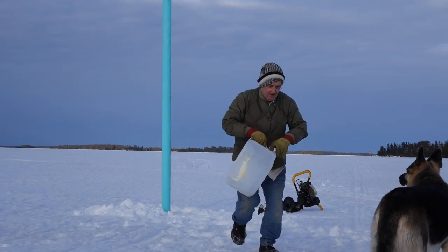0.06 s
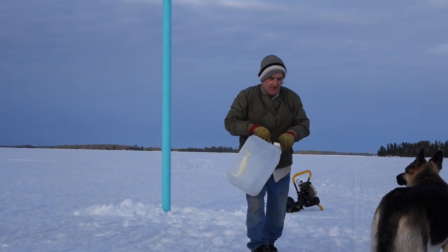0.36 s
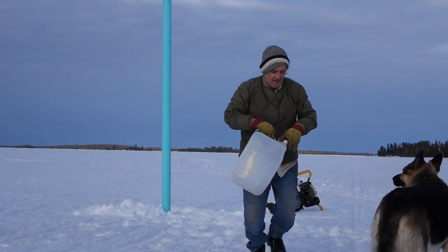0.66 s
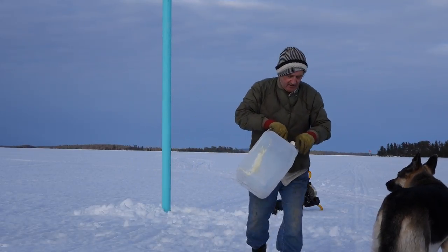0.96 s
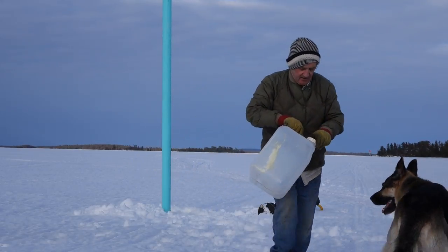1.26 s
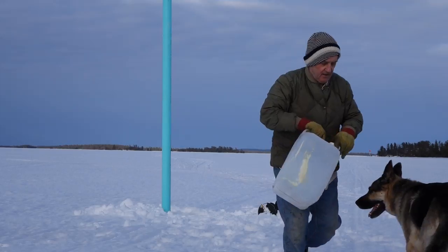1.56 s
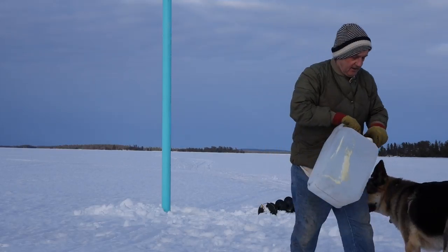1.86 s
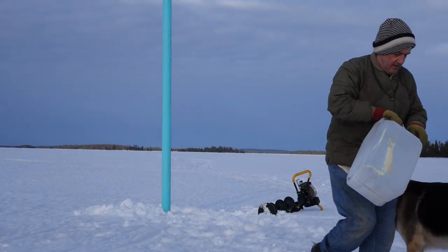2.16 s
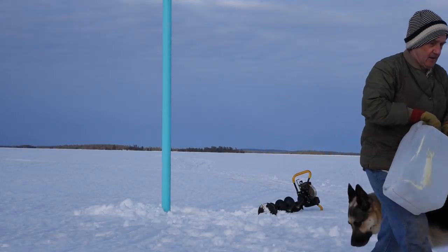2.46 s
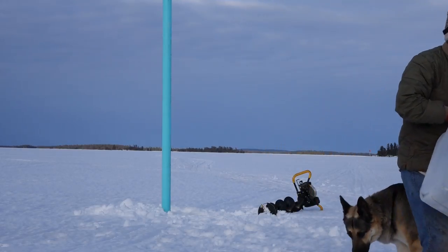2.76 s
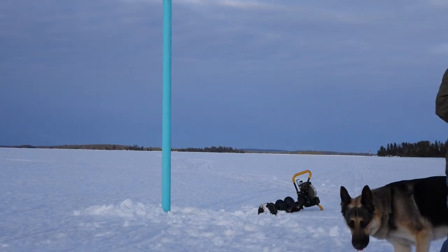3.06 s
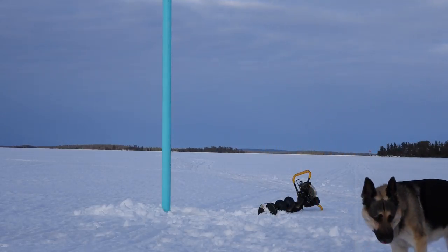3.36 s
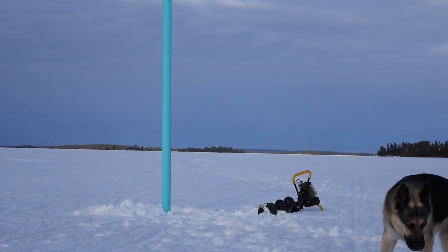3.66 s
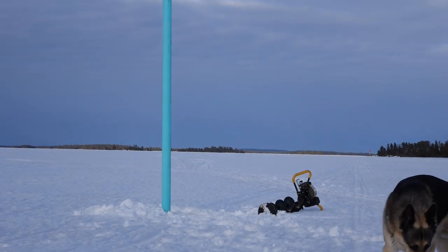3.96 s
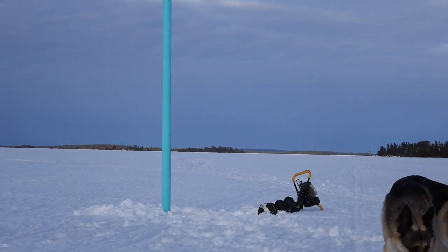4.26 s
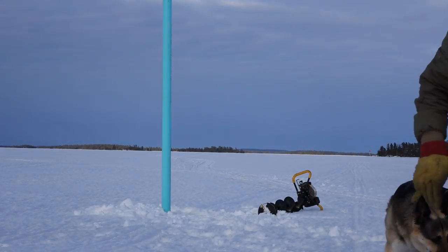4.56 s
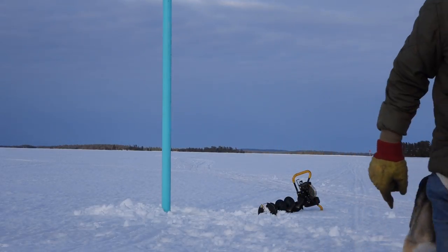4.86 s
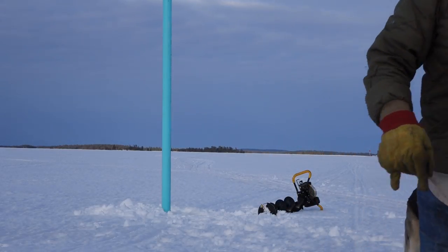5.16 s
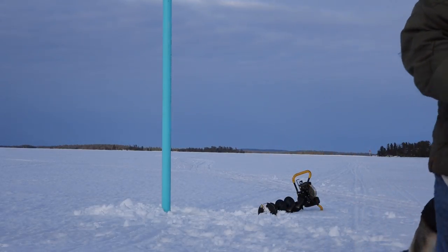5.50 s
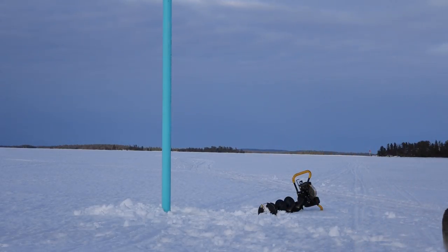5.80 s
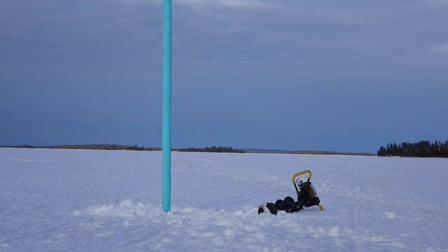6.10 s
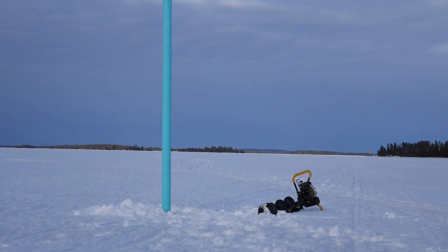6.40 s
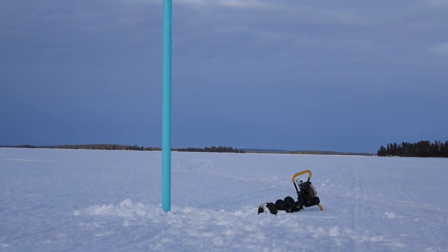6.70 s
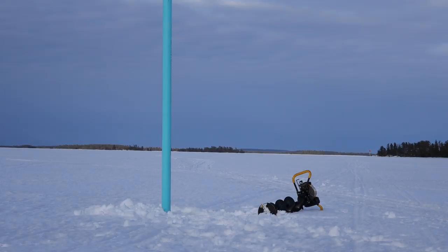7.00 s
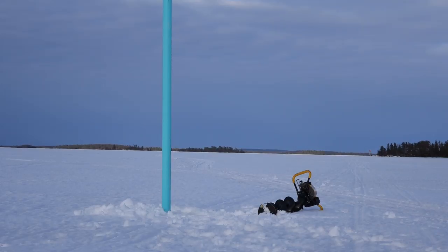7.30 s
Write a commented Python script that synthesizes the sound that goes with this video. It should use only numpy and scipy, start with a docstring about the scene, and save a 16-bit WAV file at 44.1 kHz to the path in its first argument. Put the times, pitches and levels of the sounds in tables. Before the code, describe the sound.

Footsteps crunch on packed snow, approaching from a distance, then creak loudly right beside the microphone before a jacket swishes in still air.

```python
"""On a frozen lake, a man in boots walks up over packed snow, treads beside a camera and passes behind it.
Each load compacts the snow (low creak), fractures its crust (crunch) and sifts powder (fizz); stick-slip
friction adds brief squeaks. His jacket swishes as cloth rubs on cloth, and an empty jug thuds against him.
The air is still, so the faint purr of the camera's mechanism is heard over a steady hush."""
import sys
import numpy as np
from scipy import signal
from scipy.fft import rfft, irfft, next_fast_len
from scipy.io import wavfile
from scipy.ndimage import uniform_filter1d, map_coordinates

SR = 44100
rng = np.random.default_rng(int(sys.argv[2]) if len(sys.argv) > 2 else 0)


def transcribe(u):
    """Save the signal u as a 16-bit wav file named by the first command-line argument.

    u: samples, shape (n,) or (channels, n), limited to [-1, 1]; the rate is SR.
    q: integer samples, one column per channel.
    """
    v = np.clip(np.atleast_2d(u).T, -1, 1)
    q = np.round(v * 32767).astype(np.int16)
    wavfile.write(sys.argv[1], SR, q)


N = 323694
TIME = np.arange(N) / SR


# shifts of weight close by, at relative levels: start_s, hold_s, creak_db, crunch_db, powder_db
TREADS = [(4.583, 0.048, -26, -32.5, -46.5), (4.65, 0.16, -41.5, -45, -54.5),
          (4.732, 0.14, -63, -42, -44.5), (4.802, 0.11, -40, -31.5, -52), (4.853, 0.085, -19.5, -34, -46),
          (4.958, 0.023, -32, -71, -52.5), (5.074, 0.045, -24.5, -37.5, -53),
          (5.136, 0.056, -22.5, -29, -43), (5.218, 0.13, -36.5, -32.5, -41.5),
          (5.364, 0.047, -32.5, -32.5, -45), (5.43, 0.07, -40, -39.5, -44.5), (5.55, 0.039, -48, -41, -59),
          (5.653, 0.27, -49, -52.5, -63.5)]
# spectra of snow yielding close by: frequency_hz, level_db
NEAR_CREAK = [(20, -46), (55, -47), (110, -14), (170, -4), (215, -9), (280, -16), (335, -2), (385, 2),
              (480, -3.5), (610, -0.5), (760, -8.5), (950, -29), (1300, -40), (2100, -97)]
NEAR_RASP = [(300, -23), (520, -8.5), (680, 4.5), (980, -6.5), (1300, -6), (2200, -55)]
NEAR_CRUNCH = [(500, -28), (900, 3), (1300, -0.5), (1600, 0.5), (2300, 2), (3100, -6), (4200, -7),
               (7000, -119)]
NEAR_POWDER = [(2000, -19), (3000, -11.5), (4500, -7), (6000, -6.5), (7500, -12), (11500, -12)]

def close_treads(attack_s=0.01, sag_db_per_s=26.5, releases_db_per_s=(227, 405, 324)):
    """Compaction: under full weight the snow packs in quick slips, heard as a hollow creak."""
    gains = np.zeros((3, N))
    for start, hold, *levels_db in TREADS:
        for gain, db, release in zip(gains, levels_db, releases_db_per_s):
            gain += amp(db) * envelope(start, hold, attack_s, sag_db_per_s, release)
    creak, crunch, powder = gains
    rasp = np.sqrt(creak * crunch)  # the creak's upper edge lasts only while crust still breaks
    return (creak * amp(-3.5) * grains(NEAR_CREAK, per_s=420, spread_db=0.5, clump_db=2, clump_hz=120,
                                       smear=0.36, patchy_db=2)
            + rasp * amp(-4.5) * grains(NEAR_RASP, per_s=250, spread_db=1.5, clump_db=2, clump_hz=190,
                                        smear=0.43, patchy_db=5)
            + crunch * amp(-6) * grains(NEAR_CRUNCH, per_s=1400, spread_db=0.5, clump_db=2.4,
                                        clump_hz=73, smear=0.96, patchy_db=6.5)
            + powder * amp(2) * grains(NEAR_POWDER, per_s=6000, spread_db=1.5, clump_db=3, clump_hz=79,
                                       smear=1.6, patchy_db=4))


# footfalls, at relative levels: start_s, full_weight_after_s, lift_after_s, creak_db, crunch_db, powder_db
STEPS = [(0.315, 0.066, 0.23, -63, -59, -59.5), (0.829, 0.13, 0.24, -56, -55, -56.5),
         (1.32, 0.15, 0.16, -53, -53.5, -53.5), (1.805, 0.055, .055, -54.5, -60.5, -73.5),
         (1.901, 0.052, 0.208, -54, -53, -58), (2.435, 0.013, 0.035, -53, -53.5, -58.5),
         (2.545, 0.072, 0.11, -72, -65, -72), (2.92, 0.15, .17, -57.5, -54.5, -54),
         (3.545, 0.15, 0.23, -54, -51.5, -49.5), (4.163, 0.098, 0.28, -52, -50, -50.5),
         (5.782, 0.12, 0.17, -44.5, -45, -52.5)]
# spectra of snow yielding farther off: frequency_hz, level_db
FAR_CREAK = [(50, -41), (110, -33), (185, -7.5), (280, -18), (380, -1.5), (620, 4.5), (850, -5),
             (1400, -47)]
FAR_CRUNCH = [(460, -57.5), (780, -8.5), (1300, 0), (1440, -3.5), (1710, -3), (3200, -9), (4160, -30),
              (7040, -120)]
FAR_POWDER = [(2000, -25.5), (2900, -11), (3700, -6), (4800, 2), (6500, 3), (8000, 0), (10000, 2),
              (11500, -1.5)]

def walking_steps(touch_s=0.0045, sink_s=0.044, lift_decays_s=(0.022, 0.014, 0.038), settle_db=-10):
    """Acoustic emission: creak and crunch grow with the load and ease as the snow firms."""
    gains = np.zeros((3, N + SR))
    t = np.arange(SR) / SR
    for start, full, lift, *levels_db in STEPS:
        unloading = np.exp(-np.maximum(t - lift, 0) / np.vstack(lift_decays_s))
        unloading = np.maximum(unloading, amp(settle_db))  # loose snow goes on settling in the print
        contact = (1 - np.exp(-t / touch_s)) * unloading
        weight = crest(t - full, rise_db_per_s=75, fall_db_per_s=58.5)
        sifting = crest(t - sink_s, rise_db_per_s=172, fall_db_per_s=41.5)  # peaks as the heel sinks in
        step = contact * amp(np.vstack(levels_db)) * [weight, weight, sifting]
        gains[:, round(start * SR):][:, :SR] += step
    creak, crunch, powder = gains[:, :N]
    creak = creak * amp(-6) * grains(FAR_CREAK, per_s=780, spread_db=2, clump_db=4.5, clump_hz=230,
                                     smear=0.58, patchy_db=7)
    crunch = crunch * amp(-1.5) * grains(FAR_CRUNCH, per_s=1300, spread_db=0.5, clump_db=2,
                                         clump_hz=100, smear=0.94, patchy_db=5)
    powder = powder * amp(1.6) * grains(FAR_POWDER, per_s=4100, spread_db=1.5, clump_db=2.8,
                                        clump_hz=74, smear=3.2, patchy_db=1.5)
    return creak + panned(crunch, left_db=0.7) + panned(powder, left_db=0.5)


# short crunches and ticks of snow, and three soft knocks near the end, probably the jug,
# at relative levels: start_s, low_db, middle_db, high_db
BURSTS = [(0.033, -68, -59.5, -59.5), (0.2, -75, -65, -71), (0.226, -72, -64.5, -68),
          (0.316, -80, -60.5, -60.5), (0.349, -70, -58.5, -55), (0.375, -72, -57.5, -54),
          (0.541, -78, -60, -58.5), (0.589, -78, -61.5, -59.5), (0.94, -61, -55, -54),
          (1.068, -60.5, -54.5, -57.5), (1.424, -48.5, -46, -51), (1.554, -66, -61, -74),
          (1.717, -70, -61.5, -77), (1.869, -69, -60, -57), (2.021, -45.5, -41.5, -47),
          (2.132, -62.5, -52, -47.5), (2.532, -55, -58, -58), (2.637, -53, -57, -62),
          (2.953, -56, -57, -51), (3.958, -70, -59.5, -44.5), (4.011, -65, -70, -46.5),
          (4.051, -55.5, -55, -41.5), (4.079, -60, -58.5, -53), (4.113, -59.5, -70, -56),
          (4.167, -56, -59, -55), (5.091, -41, -27, -33), (5.148, -36, -25, -38), (5.374, -42, -30.5, -54),
          (5.438, -39, -34, -63), (5.519, -55, -40.5, -35.5), (5.674, -42.5, -38, -48),
          (6.004, -45, -51.5, -55.5), (6.358, -44.5, -45, -58), (7.012, -47, -44, -51)]

def crunches_and_knocks(rise_s=0.0018, burst_s=0.018, tail_db=-22, tail_s=0.063):
    """Transient excitation: each crunch, tick or soft knock is one dense burst of grains."""
    gains = np.zeros((3, N + SR))
    t = np.arange(SR // 4) / SR
    stretch = np.vstack([1.5, 1, 1])  # the low band rises and falls more slowly
    onset = (1 - np.exp(-t / (rise_s * stretch))) ** 2
    decay = np.exp(-(t / (burst_s * stretch)) ** 2) + amp(tail_db) * np.exp(-t / tail_s)
    for start, *levels_db in BURSTS:
        gains[:, round(start * SR):][:, :len(t)] += amp(np.vstack(levels_db)) * onset * decay
    low, middle, high = gains[:, :N]
    return (low * amp(-1.5) * grains(FAR_CREAK, per_s=660, spread_db=4, clump_db=1, clump_hz=410,
                                     smear=0.32, patchy_db=4)
            + middle * amp(-2) * grains(NEAR_CRUNCH, per_s=3800, spread_db=0.5, clump_db=1.5,
                                        clump_hz=150, smear=0.52, patchy_db=4.5)
            + high * amp(-1) * grains(FAR_POWDER, per_s=2400, spread_db=7, clump_db=1, clump_hz=550,
                                      smear=0.49, patchy_db=1.5))


# cold crystals squeaking or groaning under the sole: centre_s, half_length_s, pitch_hz, level_db
SQUEAKS = [(2.976, 0.027, 920, -53.5), (4.28, .026, 1300, -44.5), (4.83, 0.018, 2406, -39),
           (4.937, 0.024, 511, -21), (5.124, 0.011, 380, -23), (5.192, 0.0062, 5640, -35.5),
           (5.405, 0.0072, 388, -21), (5.497, 0.014, 5590, -40), (5.526, 0.0056, 2648, -33),
           (5.918, 0.019, 1150, -46.5)]

def squeaks(waver_rad=1.43, knots_per_cycle=0.24, flutter=0.5, low_cut_hz=280):
    """Stick-slip friction briefly locks to one rough pitch; phase and size stray every few slips."""
    out = np.zeros(N)
    for centre, half_length, hz, db in SQUEAKS:
        stray_hz = knots_per_cycle * hz
        slips = np.sin(2 * np.pi * hz * TIME + waver_rad * wobble(stray_hz))
        slips *= 1 + flutter * wobble(stray_hz)
        out += amp(db) * np.exp(-((TIME - centre) / half_length) ** 2) * slips
    highpass = signal.butter(4, low_cut_hz, 'high', fs=SR, output='sos')
    return panned(signal.sosfilt(highpass, out), left_db=1.2)


# long sleeve strokes, and bouts of the clothes stirring: start_s, length_s, level_db
SWISHES = [(6.128, .62, -41), (7.053, .3, -43.5)]
RUSTLES = [(0, 0.23, -70.5), (1.553, 0.59, -73.5), (2.285, 0.21, -69.5), (3.78, 1.4, -68),
           (4.59, 1.073, -62.5), (5.904, 2.4, -59)]
# spectra of sliding cloth and of stirring folds: frequency_hz, level_db
CLOTH = [(71, -64), (120, -41), (220, -17), (276, -16.5), (395, -4.5), (780, -4), (1020, -6.5), (1160, -4),
         (1300, -2), (1510, -6.5), (2570, 0), (3040, -1.5), (11000, -5), (14300, -43), (22000, -120)]
FOLDS = [(60, -38), (170, -15), (300, -22.5), (450, -12.5), (1200, -5.5), (2400, -2.5), (3600, -9),
         (11000, -6)]

def jacket():
    """Friction noise: rubbing cloth gives a faint, uneven rustle and two long swishes."""
    swish = sum(amp(db) * envelope(start, length, attack_s=0.097, sag_db_per_s=14.5, release_db_per_s=107)
                for start, length, db in SWISHES)
    rustle = sum(amp(db) * envelope(start, length, attack_s=0.005, sag_db_per_s=-3, release_db_per_s=105)
                 for start, length, db in RUSTLES)
    rustle *= amp(0.67 * wobble(21.5))
    sliding = grains(CLOTH, per_s=9000, spread_db=1, clump_db=1.2, clump_hz=91, smear=1.6, patchy_db=1.5)
    folding = grains(FOLDS, per_s=1100, spread_db=1, clump_db=5, clump_hz=66, smear=1.35, patchy_db=2.5)
    return panned(swish * sliding, left_db=-0.6) + rustle * folding


# bumps of the empty plastic jug: start_s, level_db
BUMPS = [(0.225, -71.5), (1.833, -59), (1.905, -62), (1.955, -64), (3.824, -60), (6.359, -71), (6.533, -72),
         (7.017, -54)]
# spectrum of its hollow body: frequency_hz, level_db
JUG_BODY = [(40, -40), (100, -21), (185, -1), (280, -15), (420, -3), (800, -23), (1500, -66)]

def jug():
    """Impact excitation: a soft contact stirs the low resonances of a hollow body into a short thud."""
    thuds = sum(amp(db) * envelope(start, 0.017, attack_s=0.0082, sag_db_per_s=0, release_db_per_s=330)
                for start, db in BUMPS)
    return thuds * coloured(rng.standard_normal((1, N)), JUG_BODY)


# resonant spectrum of the camera's case: frequency_hz, level_db
CAMERA_CASE = [(250, -52), (400, -16.5), (520, -26.5), (612, 2), (690, -3.5), (800, -48.5), (2000, -58.5)]

def camera_purr(twitch_hz=30, depth_db=5, level_db=-71.5, delay_s=0.014):
    """Forced vibration: the mechanism twitches periodically and rings the camera's case."""
    twitch = amp(depth_db * np.cos(2 * np.pi * twitch_hz * (TIME - delay_s)))
    return amp(level_db) * coloured(twitch * rng.standard_normal((1, N)), CAMERA_CASE)


# spectrum of the hush: frequency_hz, level_db
HUSH = [(20, -68), (80, -39), (170, -9), (280, -16.5), (380, -0.5), (520, 2), (610, 11), (850, -13.5),
        (1800, -6), (3200, -14.5), (11000, -18)]

def still_air(level_db=-73):
    """Stationary noise: the lake and the microphone set a steady floor."""
    return amp(level_db) * coloured(two_ports(rng.standard_normal(N)), HUSH)


def grains(spectrum, per_s, spread_db, clump_db, clump_hz, smear, patchy_db, window=768):
    """Shot noise: tiny slips click in small avalanches over a smear of finer ones, at steady power."""
    clicks = (rng.random(N) < per_s / SR) * rng.choice([-1, 1], N)
    clicks = clicks * amp(spread_db * rng.standard_normal(N))
    slips = clicks / np.std(clicks) + smear * rng.standard_normal(N)
    avalanches = slips * amp(clump_db * wobble(clump_hz))
    pair = coloured(two_ports(patchy(avalanches, patchy_db)), spectrum)
    power = uniform_filter1d(uniform_filter1d(pair.mean(axis=0) ** 2, window), window)
    return pair / np.sqrt(np.abs(power) + 1e-6)


def patchy(x, depth_db, window=384, frames=9):
    """Local resonance: each patch of snow or cloth rings its own way, so narrow peaks come and go."""
    spectra = signal.stft(x, nperseg=window)[2]
    peaks = uniform_filter1d(rng.standard_normal(spectra.shape), size=2, axis=0)
    peaks = uniform_filter1d(peaks, size=frames, axis=1)
    return signal.istft(spectra * amp(depth_db * peaks / np.std(peaks)), nperseg=window)[1][:N]


# the walker's bearing, from ahead to the right: time_s, left_port_lag_s
BEARING = [(1, -.00002), (3.7, .000045), (5, .000025)]
# likeness of the sound at the two microphone ports: frequency_hz, direct_share
COHERENCE = [(60, 0.99), (450, 0.97), (900, 0.99), (1400, 0.51), (2200, 0.64), (4200, 0.59), (8000, 0.077)]

def two_ports(x, window=96):
    """Path difference delays one port; scatter off the snow reaches each port in random phase."""
    hz, t, spectra = signal.stft(x, SR, nperseg=window)
    lag_s = np.interp(t, *np.transpose(BEARING))
    share = np.clip(along(COHERENCE, hz), 0, 1)[:, None]
    lag_cycles = lag_s * np.multiply.outer([.5, -.5], hz)[..., None]
    direct = np.sqrt(share) * np.exp(-2j * np.pi * lag_cycles)
    # scattered copies add in power only, hence the root of two
    scatter = np.sqrt(2 * (1 - share)) * np.exp(2j * np.pi * rng.random((2, *spectra.shape)))
    return signal.istft(spectra * (direct + scatter), nperseg=window)[1][:, :N]


# resonances and notches of the microphone housing: centre_hz, width_hz, gain_db
HOUSING = [(1023, 180, 6.5), (1175, 35, -13), (1311, 44, 9), (1410, 530, -3.5), (1760, 99, 4.5),
           (2017, 220, -5.5), (2076, 210, 4), (3520, 35, 7), (3610, 420, -0.5), (4500, 380, 1.5),
           (7140, 930, -0.5)]

def coloured(x, spectrum, taps=4096):
    """Minimum-phase filtering by source spectrum and housing; the channel mean comes out at rms 1."""
    hz = np.fft.rfftfreq(taps, 1 / SR)
    housing_db = sum(db / (1 + (2 * (hz - centre) / width) ** 2) for centre, width, db in HOUSING)
    cepstrum = irfft(np.log(amp(along(spectrum, hz) + housing_db) + 1e-6))
    cepstrum[1:taps // 2] *= 2  # folding the cepstrum makes the response causal
    cepstrum[taps // 2 + 1:] = 0
    impulse_response = irfft(np.exp(rfft(cepstrum)))
    y = signal.oaconvolve(x, impulse_response[None], axes=1)[:, :N]
    return y / np.std(y.mean(axis=0))


def envelope(start_s, hold_s, attack_s, sag_db_per_s, release_db_per_s):
    """Exponential decay of one contact: a smooth attack, a sloping hold and a release."""
    t = np.maximum(TIME - start_s, 0)
    fall_db = sag_db_per_s * np.minimum(t, hold_s) + release_db_per_s * np.maximum(t - hold_s, 0)
    return (1 - np.exp(-(t / attack_s) ** 2)) * amp(-fall_db)


def crest(t, rise_db_per_s, fall_db_per_s):
    """Exponential growth to a gain of 1 at t = 0, then exponential decay."""
    return amp(np.minimum(rise_db_per_s * t, -fall_db_per_s * t))


def wobble(knots_per_s):
    """Random modulation: a smooth curve through Gaussian knots."""
    knots = rng.standard_normal(int(N * knots_per_s / SR) + 4)
    coarse_s = TIME[::16]
    return np.interp(TIME, coarse_s, map_coordinates(knots, [coarse_s * knots_per_s]))


def panned(x, left_db):
    """A level difference leans the sound to the left."""
    return x * amp(np.array([[.5], [-.5]]) * left_db)


def filtered(x, response):
    """Linear filtering: the spectrum of x times a response of frequency."""
    size = next_fast_len(N + SR // 2)
    return irfft(rfft(x, size) * response(np.fft.rfftfreq(size, 1 / SR)), size)[..., :N]


def along(points, hz):
    """Interpolation of (frequency_hz, value) points on a logarithmic frequency axis."""
    frequencies, values = np.transpose(points)
    return np.interp(np.log(hz + 1), np.log(frequencies + 1), values)


def amp(db):
    """Amplitude ratio of a level in decibels."""
    return 10 ** (np.asarray(db) / 20)


def scene():
    """Superposition in a free field: open snow gives no echo, so every source arrives dry."""
    movement = walking_steps() + close_treads() + crunches_and_knocks() + squeaks() + jug() + jacket()
    return movement + camera_purr() + still_air()


# unequal sensitivity of the two ports: frequency_hz, left_minus_right_db
PORT_BALANCE = [(150, -1), (600, -1.45), (1150, 2.5), (2100, -3), (4000, 0.5), (10000, 0.8)]

def record(dry, low_cut_hz=71, top_hz=11100):
    """Band limiting: the ports differ in colour, and the camera thins the bass and cuts the top treble."""
    pair = filtered(dry, lambda hz: panned(1, left_db=along(PORT_BALANCE, hz)))
    pair = signal.sosfilt(signal.butter(2, low_cut_hz, 'high', fs=SR, output='sos'), pair)
    return filtered(pair, lambda hz: 1 / np.sqrt(1 + np.minimum(hz / top_hz, 2) ** 300))


dry = scene()
out = record(dry)
transcribe(out)
```